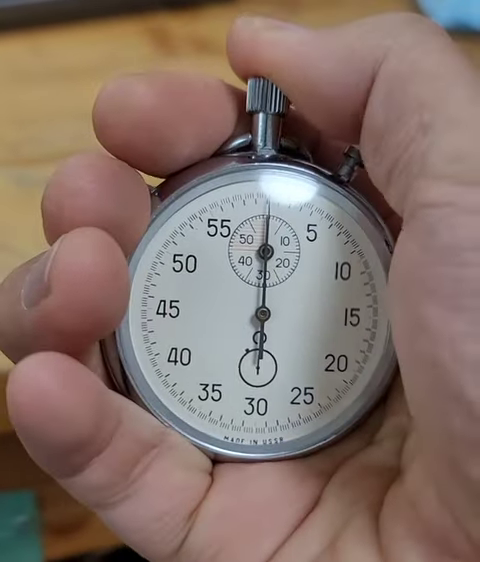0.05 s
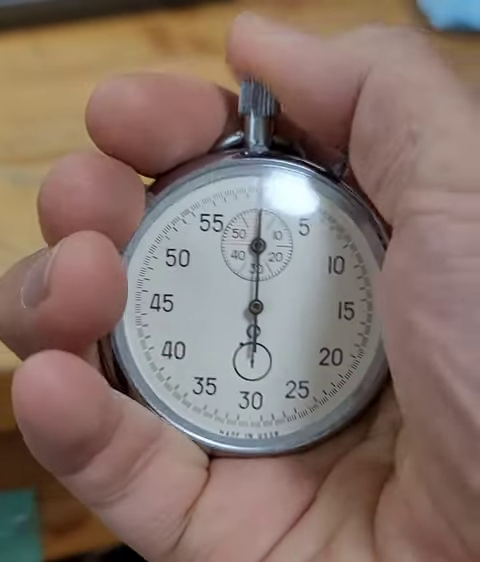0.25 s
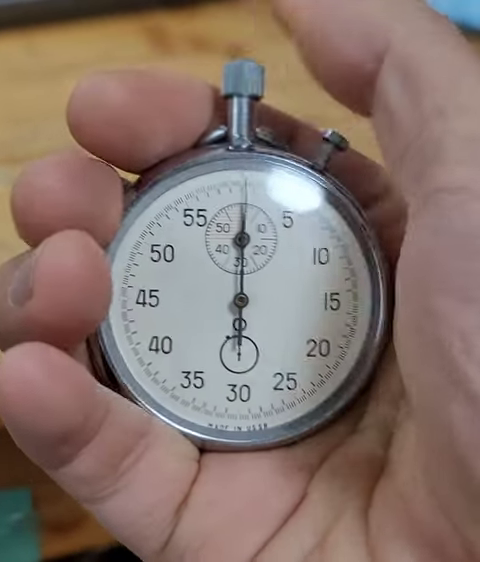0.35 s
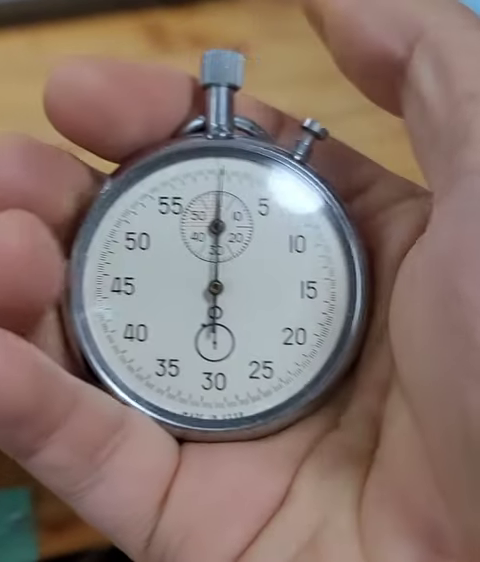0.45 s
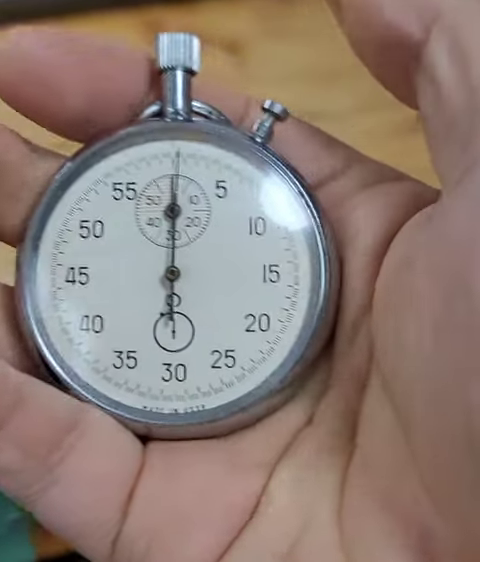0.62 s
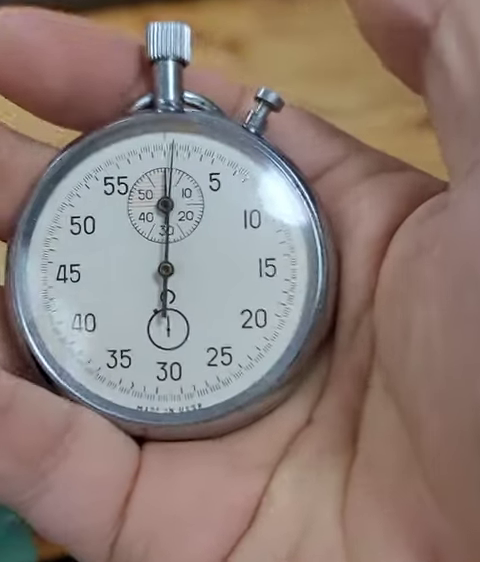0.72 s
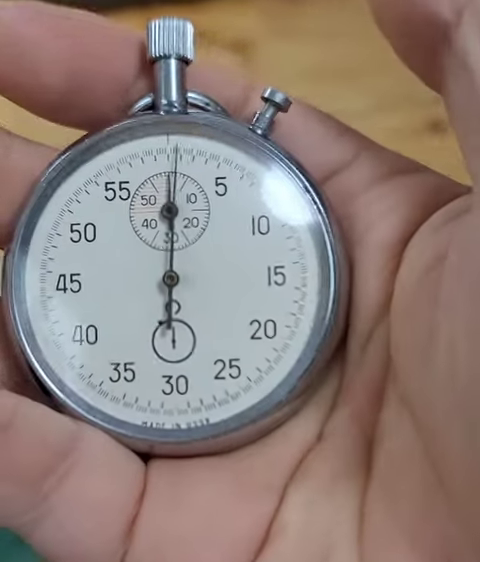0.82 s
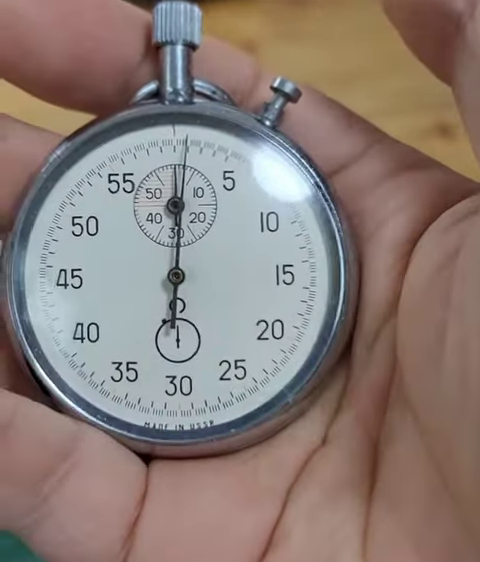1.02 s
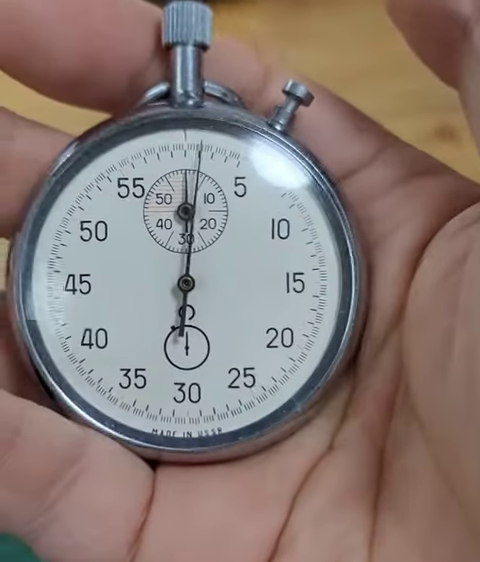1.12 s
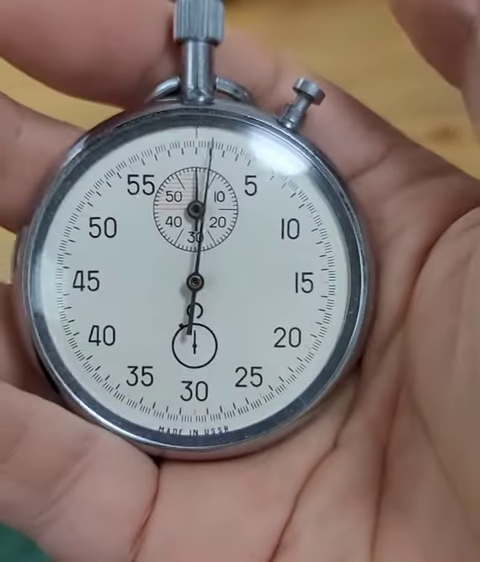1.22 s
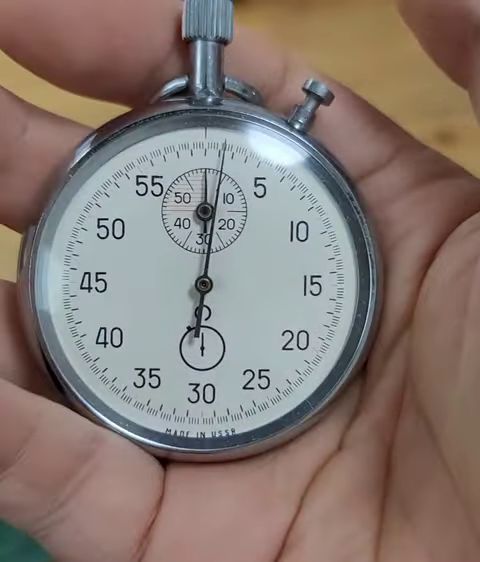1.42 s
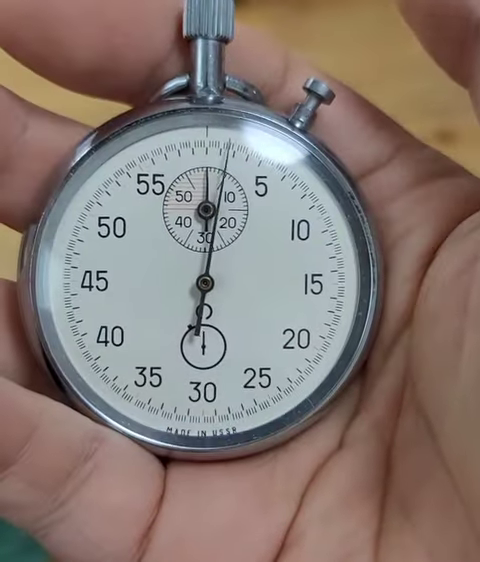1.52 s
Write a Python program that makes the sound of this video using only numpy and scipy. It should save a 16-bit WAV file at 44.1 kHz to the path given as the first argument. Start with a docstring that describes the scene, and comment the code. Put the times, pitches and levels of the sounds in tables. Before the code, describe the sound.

Close up in a small quiet room, a stopwatch crown snaps down hard and clicks back up with a brief steely ring; very faint alternating ticks follow, about five per second, over soft hiss and hum.

```python
"""A wind-up stopwatch is started in the hand, close by in a small quiet room.
The thumb takes up the crown's slack, then presses: the levers catch and snap over. Let go, the crown
springs back. Contacts are noise bursts (cracks) plus decaying sines (case ring).
The escapement then ticks faintly five times a second, in runs of tiny noise bursts.
Diffuse reflections follow each contact; under all lie filtered-noise rumble, hiss and a low hum."""
import sys
import numpy as np
from scipy import signal
from scipy.fft import rfft, irfft, next_fast_len
from scipy.io import wavfile
from scipy.ndimage import uniform_filter1d

SR = 44100
rng = np.random.default_rng(int(sys.argv[2]) if len(sys.argv) > 2 else 0)


def materialize(psi):
    """Save the field psi as 16-bit PCM at rate SR to the path in sys.argv[1].

    A 1-D psi becomes a single channel; in a 2-D psi each row is a channel.
    """
    bounded = np.clip(np.atleast_2d(psi).T, -1, 1)
    quanta = np.round(bounded * 32767).astype(np.int16)
    wavfile.write(sys.argv[1], SR, quanta)


N = 68355


def from_db(db):
    """Decibels to gain."""
    return 10 ** (np.asarray(db) / 20)


def at_hz(points, hz):
    """Read a table on a log-frequency axis."""
    f, value = np.transpose(points)
    return np.interp(np.log(np.maximum(hz, 1)), np.log(f), value)


def pan(left_minus_right_db):
    """Left and right gains for a level difference."""
    return from_db(np.array([[left_minus_right_db], [-left_minus_right_db]]) / 2)


def dying(t60_s, start_s=0):
    """Envelope that jumps to 1 and falls 60 dB per t60."""
    t = np.arange(N) / SR - start_s
    return (t >= 0) * np.exp(-np.log(1000) * np.clip(t / t60_s, 0, 10))


def contact_envelope(contacts, t60_s):
    """Contacts (t/s, level/dB) add in power, each dying away."""
    power = sum((from_db(db) * dying(t60_s, s)) ** 2 for s, db in contacts)
    return np.sqrt(power)


def coloured(x, points):
    """Causal (minimum-phase) filter with the given spectrum, built from its folded cepstrum."""
    size = 2 * next_fast_len(N, real=True)
    gain = from_db(at_hz(points, np.fft.rfftfreq(size, 1 / SR)))
    cepstrum = irfft(np.log(gain))
    cepstrum[1:size // 2] *= 2
    cepstrum[size // 2 + 1:] = 0
    response = np.exp(rfft(cepstrum))
    return irfft(rfft(x, size) * response)[..., :N]


# room background spectrum before level scaling: f/Hz, relative density/dB
AIR = [(20, -15), (38, -9), (54, 1), (80, -9), (115, -16), (280, -16), (450, -22.5), (1000, -30.5),
       (3200, -35), (6000, -41.5), (8500, -50), (12000, -45.5), (16000, -49)]
# left-right correlation of the background: f/Hz, correlation/1
AIR_LIKENESS = [(50, 0.45), (250, .6), (1000, 0.16), (4000, 0.034)]
AIR_RMS_DB, AIR_PAN_DB = -65, -2.5   # RMS before pan
HUM_HZ, HUM_WIDTH_HZ, HUM_RMS_DB = 54.4, 4, -70.5


def background():
    """Rumble and hiss as partly correlated shaped noise; narrow-band noise makes a wavering hum."""
    hz = np.fft.rfftfreq(N, 1 / SR)
    mid, side, drone = rfft(rng.standard_normal((3, N)))
    alike = np.clip(at_hz(AIR_LIKENESS, hz), -1, 1)
    stereo = np.sqrt(1 + alike) * mid + np.sqrt(1 - alike) * side * [[1], [-1]]
    air = irfft(from_db(at_hz(AIR, hz)) * stereo, N)
    hum = irfft(drone / (1 + ((hz - HUM_HZ) / HUM_WIDTH_HZ) ** 2) ** 2, N)
    air = from_db(AIR_RMS_DB) * air / air.std()
    hum = from_db(HUM_RMS_DB) * hum / hum.std()
    return pan(AIR_PAN_DB) * (air + hum)


EVEN_WIDTH_HZ = 800


def evened(x):
    """Level the broad bumps that chance leaves in the spectrum of a short burst."""
    spectrum = rfft(x)
    power = uniform_filter1d(np.abs(spectrum) ** 2, size=int(EVEN_WIDTH_HZ * N / SR), axis=-1)
    return irfft(spectrum * np.sqrt(power.mean() / power), N)


def cracks(contacts, t60_s, colour):
    """Each contact shakes many small steel parts for a few milliseconds: a coloured noise burst."""
    burst = contact_envelope(contacts, t60_s) * rng.standard_normal((2, N))
    return coloured(evened(burst), colour)


# modes of the case and its springs: f/Hz, t60/s, level/dB on touching, on pressing, on release
CASE_MODES = [(1648, 0.033, -1.5, -21.5, -36.5), (2110, .05, -14, -13.5, -35.5),
              (2807, 0.072, -20, -15, -17), (2993, 0.049, -12.5, -4.5, -9), (3142, 0.034, -1.5, -7, -1),
              (3200, 0.14, -14.5, -11.5, -19), (3374, 0.025, -9, -14.5, -16.5),
              (3860, 0.034, -15.5, -16, -38.5), (4485, 0.084, -13.5, -16.5, -21.5),
              (5020, 0.1, -17.5, -13.5, -27), (6420, .08, -17, -19.5, -26.5)]
RIGHT_LAG_S = .00004


def case_ring(contacts, mode_db):
    """Contacts feed the case modes, decaying sines; their phase lags on the right."""
    t = np.arange(N) / SR - np.array([[0], [RIGHT_LAG_S]])
    ring = 0
    for (hz, t60_s, *_), level_db in zip(CASE_MODES, mode_db):
        envelope = uniform_filter1d(contact_envelope(contacts, t60_s), size=16)   # softened onset
        tone = np.sin(2 * np.pi * (hz * t + rng.random()))
        ring = ring + from_db(level_db) * envelope * tone
    return ring


def crown(contacts, crack_t60_s, colour, mode_db):
    """One stroke of the crown: cracks of the levers and the ring of the case."""
    s, crack_db, ring_db = np.transpose(contacts)
    crack = cracks(list(zip(s, crack_db)), crack_t60_s, colour)
    return crack + case_ring(list(zip(s, ring_db)), mode_db)


PRESS_CRACK_T60_S, RELEASE_CRACK_T60_S = 0.017, .014

# thumb takes up the crown's slack: t/s, crack level/dB, ring level/dB
TOUCH = [(.0765, -46.5, -57)]
# crack colour on touching: f/Hz, level/dB
TOUCH_COLOUR = [(700, -10.5), (1600, -4.5), (3200, -1), (6500, 0), (8500, -23), (11000, -6.5),
                (12500, -14.5), (15500, -14.5)]


def touch(mode_db):
    """A faint contact as the thumb takes up the slack of the crown."""
    return crown(TOUCH, PRESS_CRACK_T60_S, TOUCH_COLOUR, mode_db)


# room decay: f/Hz, t60/s
ROOM_T60 = [(500, 0.1), (2000, 0.27), (3200, .235), (7000, 0.22), (15000, 0.22)]
ROOM_BUILD_S, ROOM_PAN_DB = .0015, -2


def room_response():
    """Diffuse reflections, normalised to unit energy before pan, dying band by band."""
    hz, t = np.fft.rfftfreq(N, 1 / SR), np.arange(N) / SR
    white = rfft(rng.standard_normal((2, N)))
    edges_hz = np.geomspace(150, 19200, 8)
    tail = 0
    for low, high in zip(edges_hz, edges_hz[1:]):
        band = irfft(white * ((hz >= low) & (hz < high)), N)
        tail = tail + band * dying(at_hz(ROOM_T60, np.sqrt(low * high)))
    tail = tail * (1 - np.exp(-(t / ROOM_BUILD_S) ** 2))
    return pan(ROOM_PAN_DB) * tail / np.sqrt(np.sum(tail ** 2, axis=1, keepdims=True))


# shading by the hand on the right side, deeper in the treble: f/Hz, level/dB
HAND_SHADE = [(4500, -1.5), (12000, -2.5)]


def placed(x, room, pan_db, room_db):
    """Direct sound, shaded by the hand on the right, plus its reflections."""
    direct = np.array([x[0], coloured(x[1], HAND_SHADE)])
    reflected = signal.fftconvolve(x, room, axes=1)[:, :N]
    return pan(pan_db) * direct + from_db(room_db) * reflected


# lever contacts as the crown goes down: t/s, crack level/dB, ring level/dB
PRESS = [(.2135, -39.5, -50), (.2255, -50.5, -43.5), (.2332, -34.5, -30), (.2351, -18.5, -22.5),
         (.2358, -10, -27), (.2445, -28, -33.5)]
# crack colour on pressing: f/Hz, level/dB
PRESS_COLOUR = [(150, -33), (250, -17), (450, -17.5), (720, -7), (1100, -8.5), (1900, -2), (3200, 2),
                (5000, 0), (5700, -3.5), (6600, 2), (7700, -12), (9300, -4.5), (12500, -4), (15000, -3)]


def press(mode_db):
    """The levers catch, then snap over as the crown goes down."""
    return crown(PRESS, PRESS_CRACK_T60_S, PRESS_COLOUR, mode_db)


# contacts as the crown springs back: t/s, crack level/dB, ring level/dB
RELEASE = [(.3902, -35, -40.5), (.4026, -22.5, -26), (.4038, -21.5, -15.5), (.4064, -21, -32.5)]
# crack colour on release: f/Hz, level/dB
RELEASE_COLOUR = [(200, -16.5), (900, -21.5), (2000, -9), (3000, -2.5), (3750, -8), (4300, 5), (5100, 4.5),
                  (5700, -3), (6500, 5), (8000, -6), (11000, 2), (15500, -7)]


def release(mode_db):
    """The crown springs back and the steel case rings."""
    return crown(RELEASE, RELEASE_CRACK_T60_S, RELEASE_COLOUR, mode_db)


# escapement beats, alternating between the two pallets: t/s, level/dB
BEATS = [(0.6253, -54.5), (0.8258, -63.5), (1.0259, -58), (1.2263, -62), (1.4262, -59)]
# unlocking, impulse, locking, rebound: t/s from the beat, level/dB re beat
BEAT_PARTS = [(-.0095, -10), (-.003, -9), (0, 5.5), (.008, -8)]
# colour of the first pallet: f/Hz, level/dB
TICK_COLOUR = [(2400, -20.5), (3300, -2), (4200, -6.5), (5200, -18.5), (6400, 1), (7100, -3), (7650, -18),
               (8200, 6.5), (8900, 1), (9800, -6.5), (12500, -12), (15500, -14)]
# colour of the second pallet: f/Hz, level/dB
TOCK_COLOUR = [(2400, -11), (3350, 0), (4300, 3.5), (5300, -18), (6450, 7.5), (7700, -17), (8600, 3.5),
               (9800, -10.5), (15500, -6)]
BEAT_T60_S = 0.018


def escapement():
    """Tick and tock of the two pallets, each a quick run of tiny contacts."""
    out = 0
    for pallet, colour in enumerate((TICK_COLOUR, TOCK_COLOUR)):
        contacts = [(s + lag_s, db + part_db)
                    for s, db in BEATS[pallet::2] for lag_s, part_db in BEAT_PARTS]
        out = out + cracks(contacts, BEAT_T60_S, colour)
    return out


def scene():
    """Touch, press, release and ticking in the room."""
    room = room_response()
    _, _, touch_db, press_db, release_db = np.transpose(CASE_MODES)
    down = placed(touch(touch_db) + press(press_db), room, pan_db=0, room_db=-8.5)
    up = placed(release(release_db), room, pan_db=1.5, room_db=-12)
    ticking = placed(escapement(), room, pan_db=0.5, room_db=-11.5)
    return down + up + ticking + background()


CUTOFF_HZ = 15900


def record(dry):
    """Steep elliptic low-pass: 0.2 dB ripple, 80 dB stop band."""
    low_pass = signal.ellip(10, .2, 80, CUTOFF_HZ, fs=SR, output="sos")
    return signal.sosfilt(low_pass, dry)


dry = scene()
out = record(dry)
materialize(out)
```